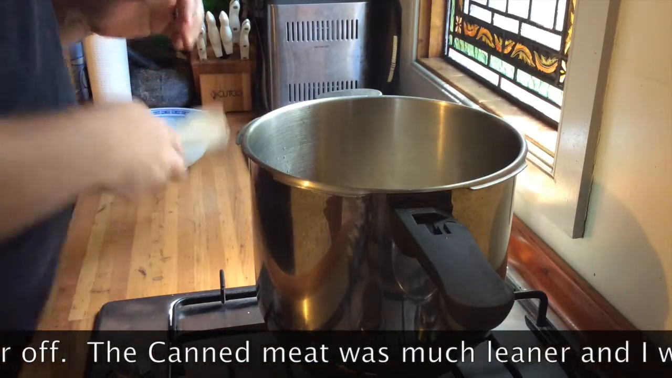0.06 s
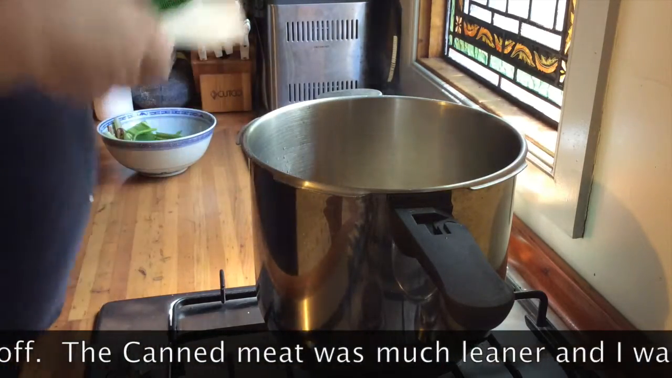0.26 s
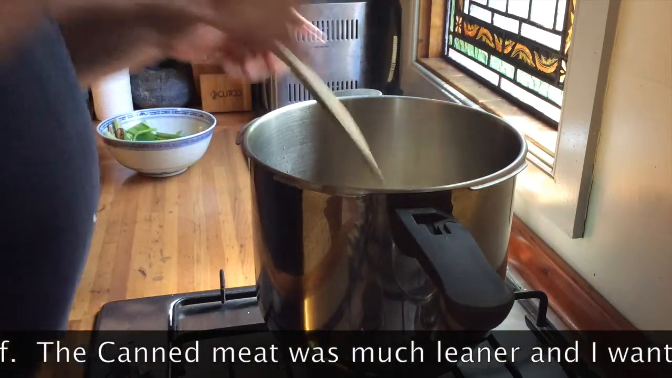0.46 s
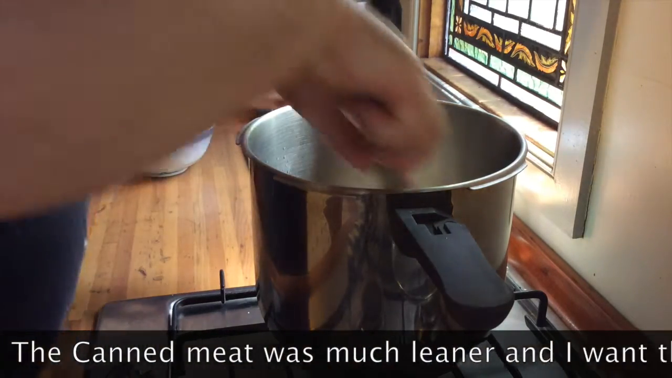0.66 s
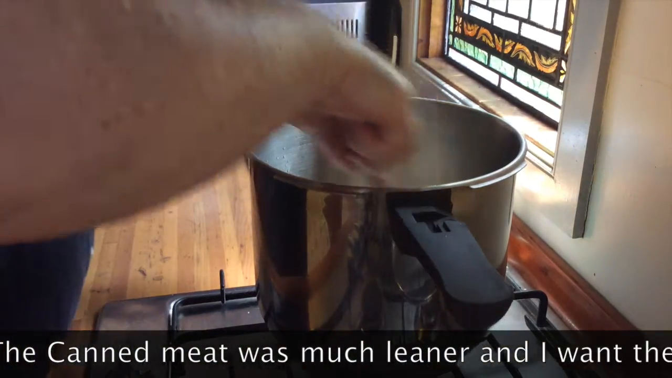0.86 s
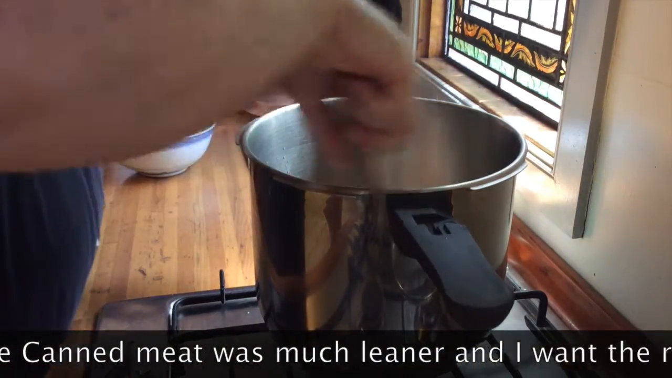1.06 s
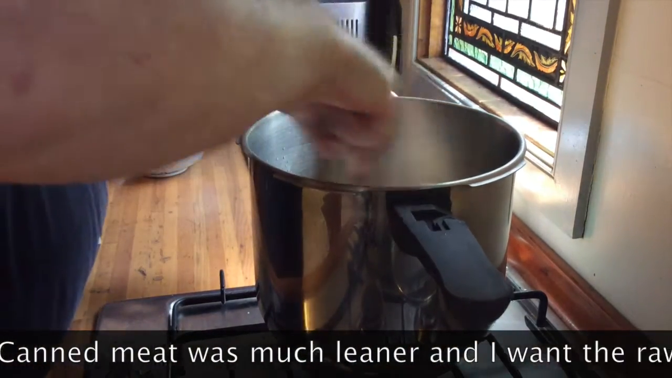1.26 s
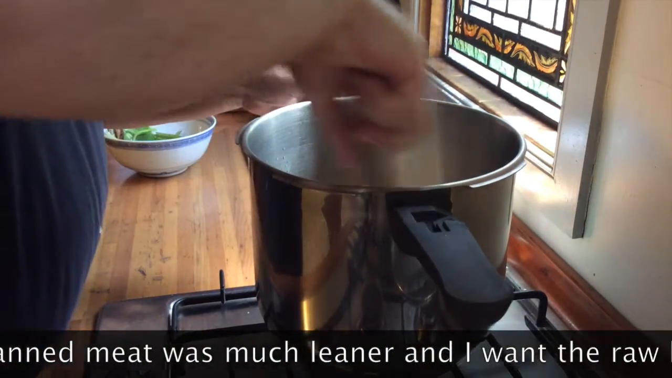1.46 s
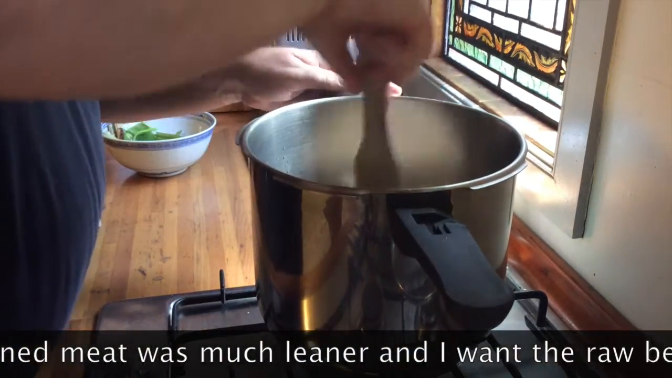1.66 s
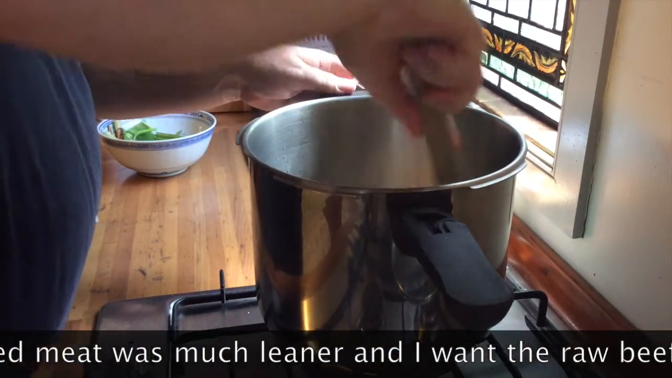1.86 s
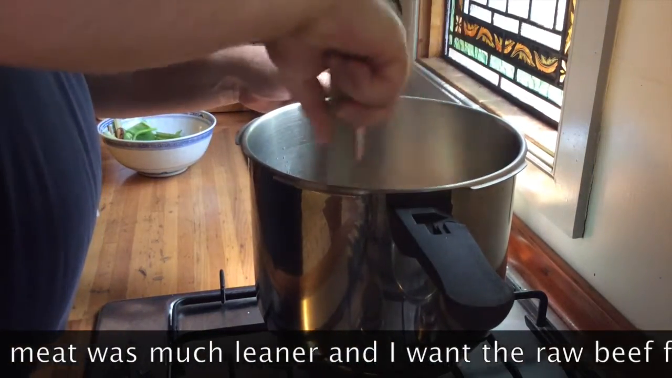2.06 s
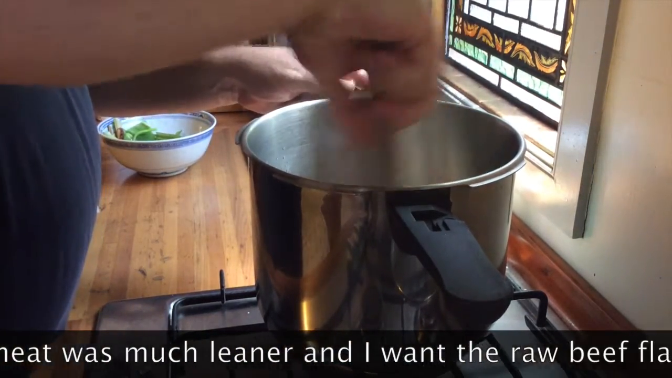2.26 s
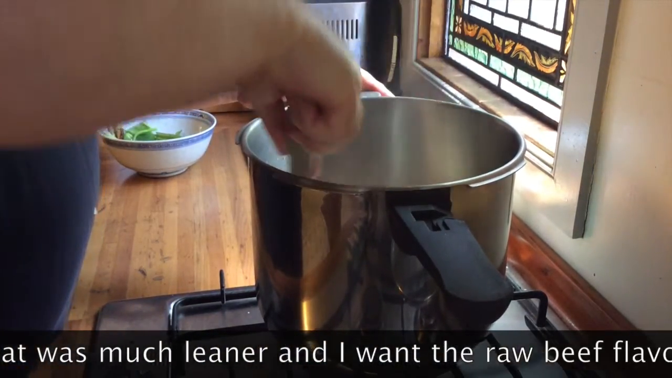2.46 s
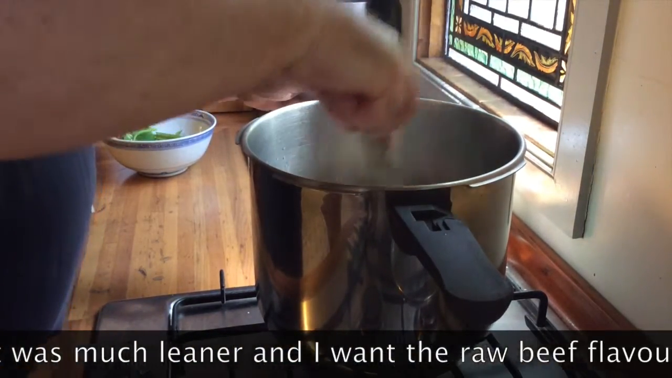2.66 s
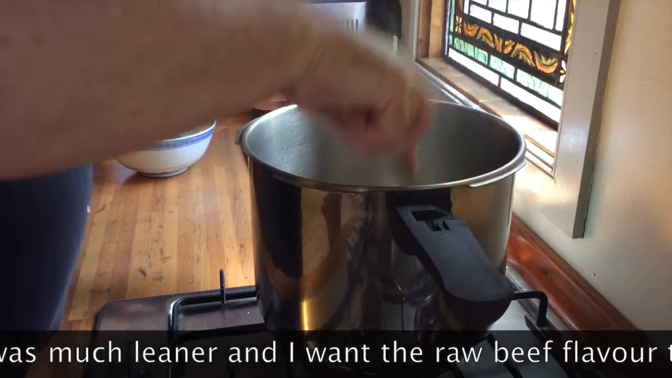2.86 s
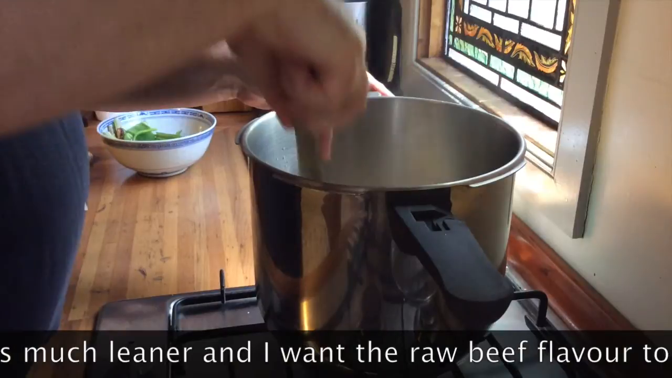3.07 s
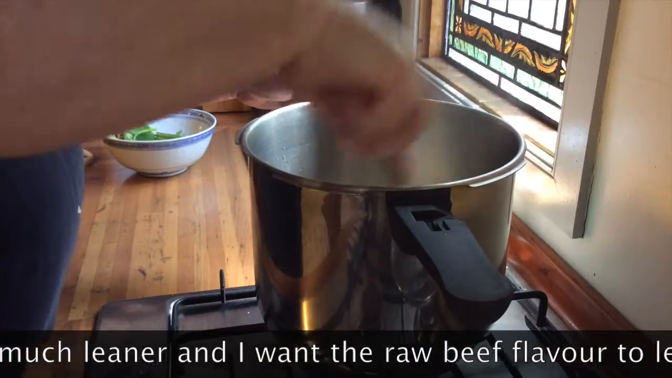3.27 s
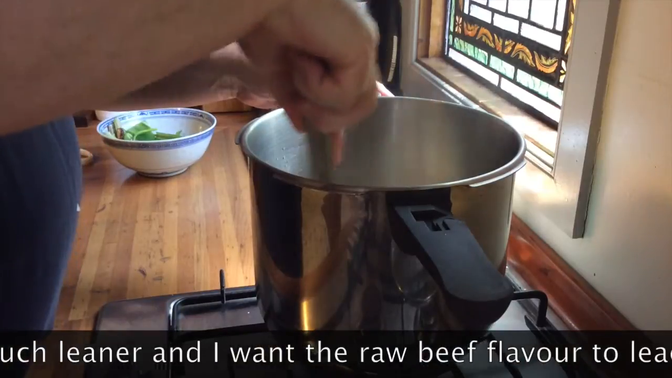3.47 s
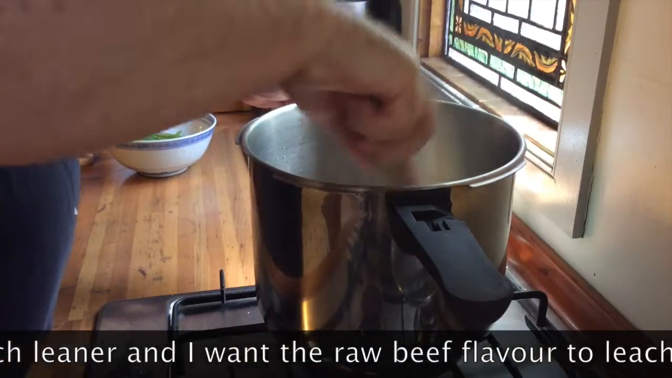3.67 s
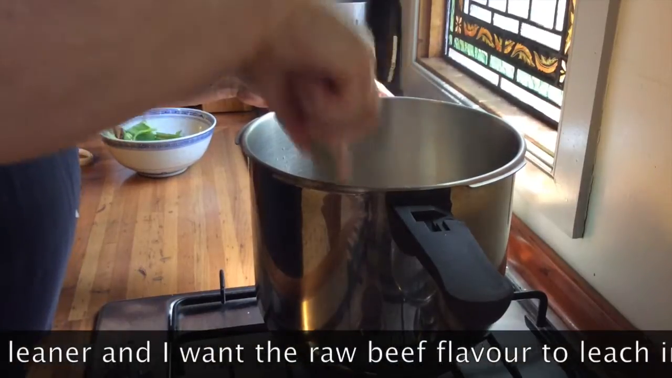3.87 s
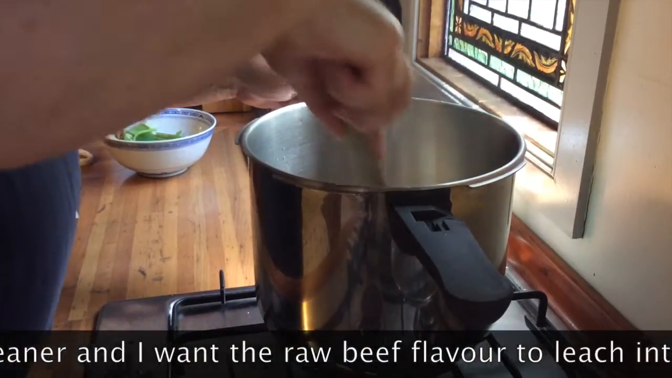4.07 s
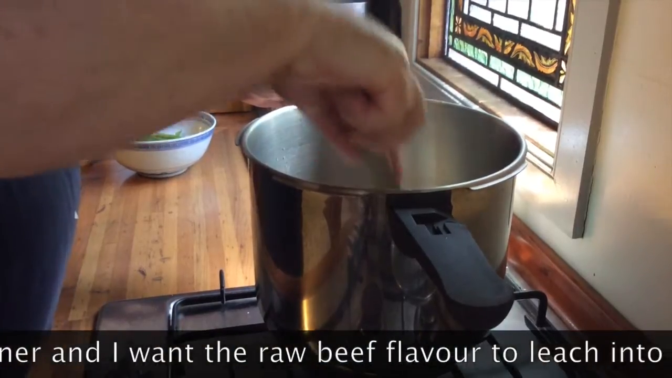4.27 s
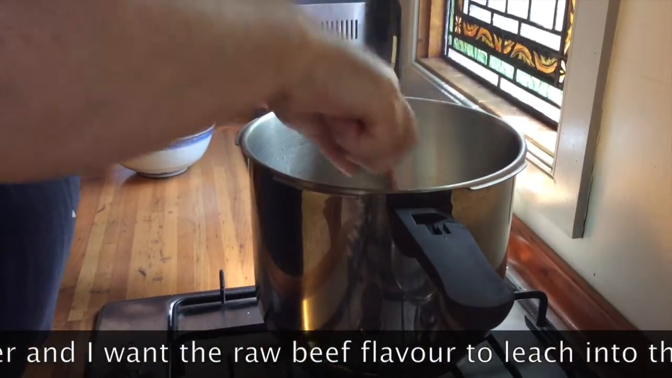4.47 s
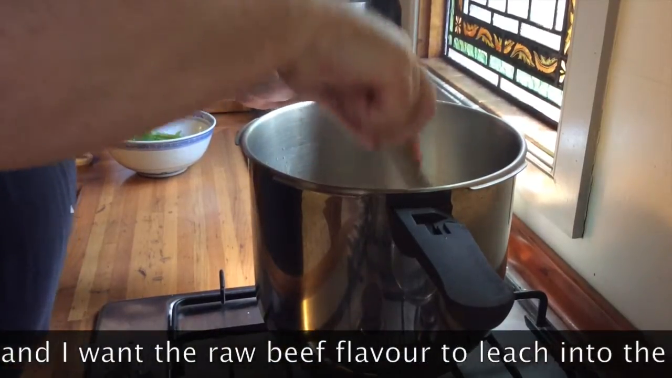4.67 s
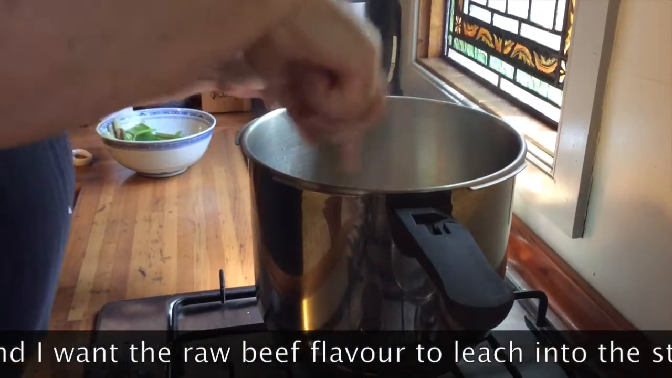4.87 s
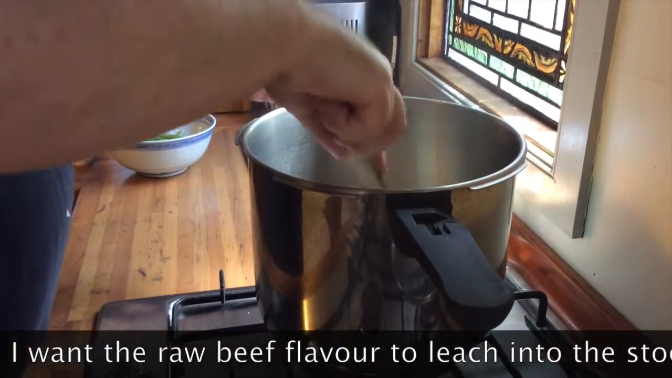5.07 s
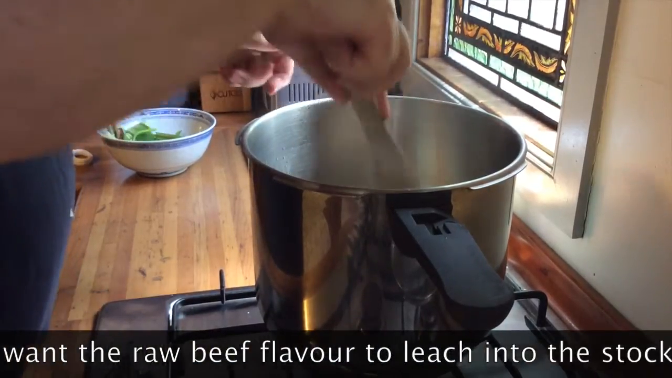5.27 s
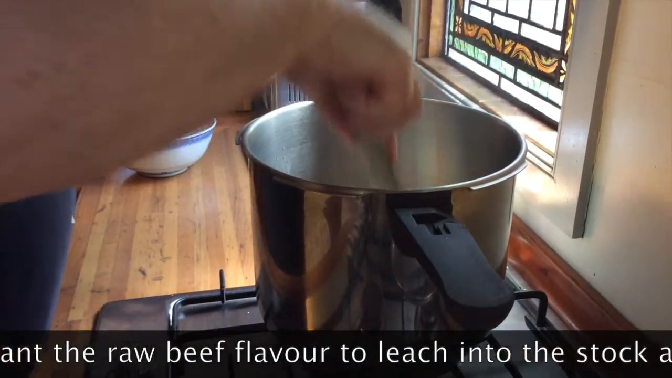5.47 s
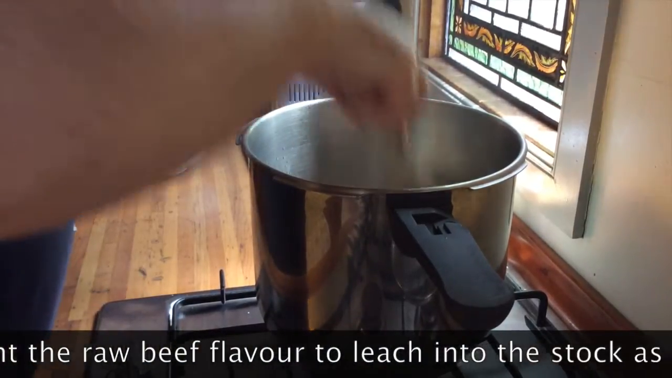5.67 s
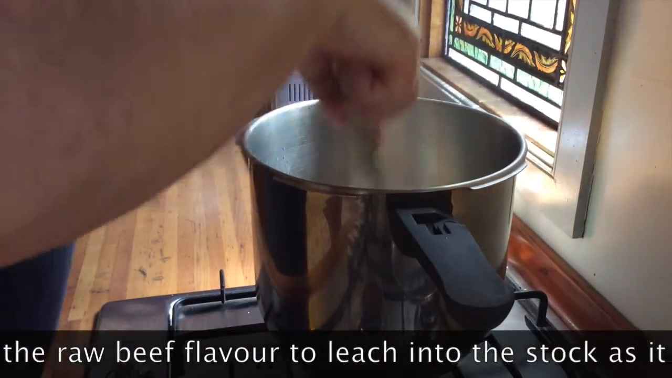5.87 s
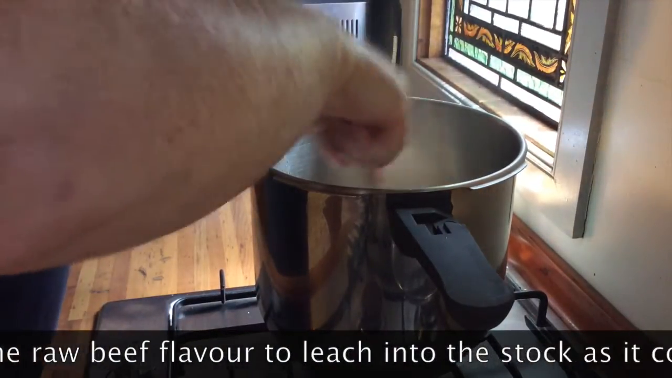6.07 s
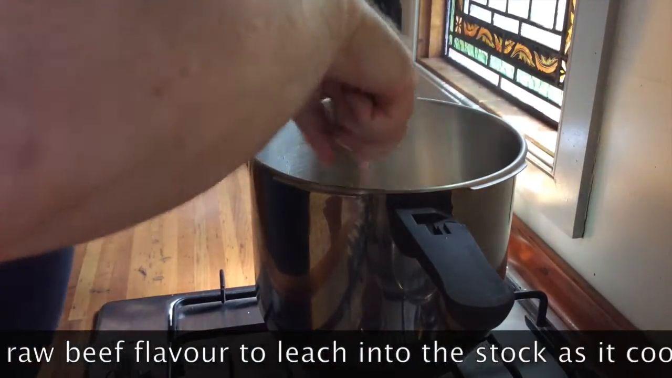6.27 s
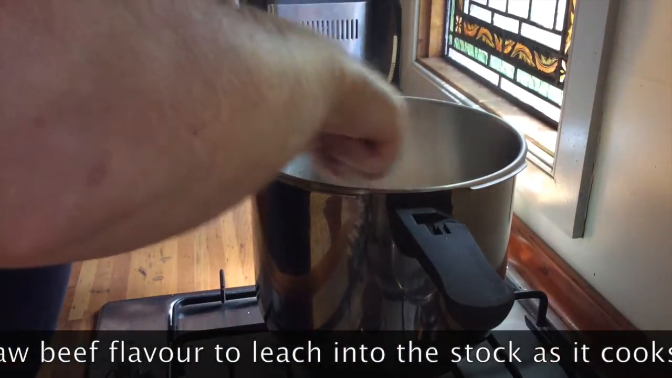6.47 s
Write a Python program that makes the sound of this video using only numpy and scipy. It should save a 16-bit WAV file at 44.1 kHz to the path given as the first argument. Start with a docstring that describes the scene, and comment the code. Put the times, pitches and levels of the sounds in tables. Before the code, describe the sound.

Food sizzles and spits in a deep steel pot, bubbles popping brightly, while a stirring spoon scrapes the bottom and knocks softly on metal.

```python
"""Kitchen, one microphone on a deep steel pot: chopped vegetables and meat fry in oil while a spoon stirs.
From the start steam bubbles burst by the thousand (clicks and hiss through the pot's resonances), the pot
booms, the spoon drags (filtered clicks), and a low sine hums over rumble. At once drops spit (noise bursts)
and soon big bubbles sing (decaying sines); from 0.7 s the spoon knocks on the steel (ringing pot modes).
Wet food flares up throughout. Close echoes ripple the treble; the top is cut steeply."""
import sys
import numpy as np
from scipy import signal
from scipy.fft import rfft, irfft
from scipy.io import wavfile

SR = 44100
rng = np.random.default_rng(int(sys.argv[2]) if len(sys.argv) > 2 else 0)


def digitize_waveform(pressure):
    """Quantize a signal to 16-bit integers and store it at the path in sys.argv[1].

    Rows of a 2-D input are taken as channels; values are limited to [-1, 1].
    """
    field = np.atleast_2d(pressure).T
    bounded = np.clip(field, -1, 1)
    quanta = np.round(bounded * 32767).astype(np.int16)
    wavfile.write(sys.argv[1], SR, quanta)


N = 288104


def from_db(db):
    return 10 ** (np.asarray(db) / 20)


def rms_one(x):
    return x / np.sqrt(np.mean(x ** 2) + 1e-20)


def band_pass(x, order, edges_hz):
    return signal.sosfilt(signal.butter(order, edges_hz, "band", fs=SR, output="sos"), x)


def high_pass(x, order, edge_hz):
    return signal.sosfilt(signal.butter(order, edge_hz, "high", fs=SR, output="sos"), x)


def over_time(table):
    """Draw each column of a table as a line over the scene, from its first column of times."""
    s, *columns = np.transpose(table)
    return [np.interp(np.arange(N) / SR, s, column) for column in columns]


def drift(rate_hz):
    """Slow chance: noise through a double one-pole low-pass at rate_hz, run in; spread 1."""
    step = 20     # samples between slow values
    r = np.exp(-2 * np.pi * rate_hz * step / SR)
    noise = rng.standard_normal(N // step + 3002)
    slow = signal.lfilter([1], [1, -2 * r, r * r], noise)[3000:]
    return np.interp(np.arange(N) / step, np.arange(len(slow)), rms_one(slow - slow.mean()))


RISE_SHARE = 0.33   # a flare or stroke rises in this share of the time it takes to fall


def swell(peak_s, length_s):
    """A rounded rise to 1 and a slower fall."""
    late = (np.arange(N) / SR - peak_s) / max(length_s, .01)
    return np.exp(-np.where(late < 0, late / RISE_SHARE, late) ** 2)


# standing resonances of the pot: (frequency [Hz], width [Hz], lift [dB])
HOLLOW = [(136, 16, -5), (165, 43, 2.5), (311, 48, 8), (422.5, 84, 10), (716, 32, 13), (802, 12.4, 14),
          (882, 52, 3.5), (973.5, 24.4, 9), (1147, 43, 3), (1384, 59, 7), (1530, 67, 10.5), (1971, 10, 6.5),
          (1996, 24, 7), (2400, 310, 3.5), (2855, 210, 2.5), (3350, 69, 2.5)]


def through_pot(x, spectrum, size=8192):
    """Causal filter whose gain is the spectrum plus the lift of each pot resonance; rms 1."""
    hz = np.maximum(np.arange(size // 2 + 1) * SR / size, 1)
    corner_hz, corner_db = np.transpose(spectrum)
    gain_db = np.interp(np.log(hz), np.log(corner_hz), corner_db)
    for centre_hz, width_hz, lift_db in HOLLOW:
        gain_db += lift_db / (1 + (2 * (hz - centre_hz) / width_hz) ** 2)
    cepstrum = irfft(np.log(from_db(gain_db)))
    cepstrum[1:size // 2] *= 2          # folding gives the minimum-phase response
    cepstrum[size // 2 + 1:] = 0
    response = irfft(np.exp(rfft(cepstrum)))
    return rms_one(signal.fftconvolve(x, response)[:N])


HISS_SHARE = 0.44   # share of the power that is smooth hiss


def bursts(per_s, spread_db, clump_db):
    """Random clicks of uneven size that come in clumps, blended with smooth steam hiss."""
    sizes = from_db(spread_db * np.minimum(rng.exponential(1, N), 5)) * rng.choice([-1, 1], N)
    born = rng.random(N) < per_s / SR
    clicks = np.sqrt(1 - HISS_SHARE) * rms_one(sizes * born)
    hiss = np.sqrt(HISS_SHARE) * rng.standard_normal(N)
    return (clicks + hiss) * from_db(clump_db)


def ring(clicks, hz, t60):
    """A unit click sets a sine of about height 1 ringing, down 60 dB after t60 seconds."""
    r, w = from_db(-60 / (t60 * SR)), 2 * np.pi * hz / SR
    return signal.lfilter([0, np.sin(w)], [1, -2 * r * np.cos(w), r * r], clicks + 1e-18)


def small_songs(per_s=400):
    """Many smaller bubbles, each at one of 40 pitches and down 60 dB after 130 cycles; rms 1."""
    sizes = from_db(3.9 * np.minimum(rng.exponential(1, N), 4))
    clicks = sizes * (rng.random(N) < per_s / SR)
    pitches_hz, dealt = np.geomspace(1900, 9000, 40), rng.integers(0, 40, N)
    return rms_one(sum(ring(clicks * (dealt == k), hz, 130.0 / hz) for k, hz in enumerate(pitches_hz)))


# colour of the bursting bubbles: (frequency [Hz], relative level [dB per Hz])
SIZZLE = [(1120, -41), (1900, -12), (2000, -8.5), (3070, -5), (3620, -5.5), (5710, 0), (7750, -2),
          (8380, 1.5), (9890, 1), (13700, 3), (15300, 1)]
# against the coarse bubbles [dB]: small bubbles, finest spray, small songs
SMALL_DB, SPRAY_DB, SONGS_DB = 0, 1, -8.5
SMALL_FOLLOWS = 0.62   # share of the treble lift


def sizzle(treble_db, surge_db):
    """Bursting bubbles in three size ranges, each flickering on its own, and small singing ones."""
    small_db, spray_db = SMALL_DB + SMALL_FOLLOWS * treble_db, SPRAY_DB + treble_db
    # (level [dB], low edge [Hz], high edge [Hz], bursts per second)
    sizes = [(0.0, 1102, 4200, 3012), (small_db, 4300, 8500, 7000), (spray_db, 8500, 18000, 4500)]
    hiss = from_db(SONGS_DB) * small_songs()
    for level_db, low_hz, high_hz, per_s in sizes:
        pops = through_pot(bursts(per_s, 2, surge_db + 0.61 * drift(7.4)), SIZZLE)
        hiss += from_db(level_db) * rms_one(band_pass(pops, 4, [low_hz, high_hz]))
    return hiss


# colour of the pot's boom: (frequency [Hz], relative level [dB per Hz])
BOOM = [(500, -28), (660, -25), (800, -21), (1000, -6), (1300, -11.5), (1600, -8.5), (1800, -11.5),
        (2000, -16.5), (2300, -24), (3000, -52)]


def boom(surge_db):
    """Bursts heard through the hollow of the pot; rms 1."""
    return through_pot(bursts(3000, 3.5, 0.78 * surge_db + 0.89 * drift(10)), BOOM)


# colour of the spoon on the bottom: (frequency [Hz], relative level [dB per Hz])
DRAG = [(50, -32), (80, -32.5), (130, -7), (200, -13), (260, -10), (360, -12.5), (450, -10.5), (540, -13.5),
        (650, -22), (800, -52.5)]
# the spoon pushes through the food along the bottom: (peak time [s], lift [dB], length [s])
STROKES = [(0.694, 5.5, 0.083), (.8, 6, 0.045), (1.12, 8.5, 0.11), (1.33, 5.5, 0.12), (1.595, 4.5, 0.16),
           (1.837, 1, 0.11), (2.108, 4, 0.4), (2.45, -1, .1), (2.71, 4, 0.049), (3.17, 1.5, 0.16),
           (3.58, 3.5, 0.072), (3.777, 3, 0.11), (4.22, 2.5, 0.21), (4.746, 1, 0.081), (5.047, 0, 0.085),
           (5.31, 0.5, .1), (5.57, -1, .08), (5.77, -1, 0.058), (5.945, 3, 0.034), (6.205, 1, 0.32),
           (6.464, 3.5, 0.13)]
DRAG_DB, DRAG_FOLLOWS = -15, .8   # at rest against the mean heat [dB]; share of the heat's changes


def spoon_drag(heat_db, surge_db):
    """Fine scrapes as random clicks through the pot, lifted by each stroke."""
    scrapes = through_pot(bursts(600, 2.56, 0.59 * surge_db + 0.12 * drift(23.0)), DRAG)
    stroke_db = sum(db * swell(peak_s, length_s) for peak_s, db, length_s in STROKES)
    mean_db = heat_db.mean()
    return from_db(DRAG_DB + mean_db + DRAG_FOLLOWS * (heat_db - mean_db) + stroke_db) * scrapes


# wet food turned onto the hot steel flares up:
# (peak time [s], lift [dB], length [s], extra lift of the treble [dB])
FLARES = [(0.012, 4.5, 0.03, -1.5), (0.088, 1, 0.017, -3), (1.143, 2, .04, -1.5), (1.23, 2, 0.042, 0),
          (1.318, 4, 0.027, -0.5), (1.38, 4, 0.083, 3.5), (1.576, 1, 0.083, 1), (1.77, 1.5, 0.14, -0.5),
          (2.18, 3.5, .1, 0), (2.27, 0.5, .08, -1.5), (2.57, 4, 0.16, -1), (2.655, 0.5, .1, -1),
          (2.903, 0, .08, 1), (3.154, 1.5, 0.077, 3.5), (3.515, 1, 0.11, 2.5), (4.085, 0.5, 0.044, 2),
          (4.25, 1, 0.077, 1.5), (5.75, 3, 0.021, -4), (5.926, 1, .08, -1.5), (6.22, -1, 0.14, 4.5),
          (6.503, 2, .08, 2)]


def flares():
    """Each flare swells and falls; returns the lift of the frying and the extra lift of its treble, in dB."""
    flare_db, extra_treble_db = np.zeros(N), np.zeros(N)
    for peak_s, lift_db, length_s, treble_lift_db in FLARES:
        shape = swell(peak_s, length_s)
        flare_db += lift_db * shape
        extra_treble_db += treble_lift_db * shape
    return flare_db, extra_treble_db


# how hard the oil fries between the flares: (time [s], sizzle level [dB], treble above it [dB])
HEAT = [(0, -42, 2.5), (.52, -42, 3), (.65, -43, 1), (.7, -39, 2), (.9, -39.5, 4), (1.05, -33.5, 2),
        (1.9, -33.5, 3), (1.97, -34, 2.5), (2.3, -31.5, 2), (2.42, -33, 1), (2.7, -33, 2), (3.05, -33.5, 2),
        (3.75, -33, 2), (3.88, -34, 1), (4.6, -34.5, 3.5), (5.2, -35.5, 2), (6.08, -36, 3),
        (6.16, -30.5, 0.5), (6.53, -34, 4)]
BOOM_DB, BOOM_FOLLOWS = -7.5, 1   # against the heat level [dB]; share of the flares


def frying():
    """Sizzle, boom and drag share one surge and the heat; the flares lift sizzle and boom."""
    heat_db, treble_db = over_time(HEAT)
    flare_db, extra_treble_db = flares()
    surge_db = 0.11 * drift(32) + 0.49 * drift(41)
    hiss = from_db(heat_db + flare_db) * sizzle(treble_db + extra_treble_db, surge_db)
    hollow = from_db(heat_db + BOOM_DB + BOOM_FOLLOWS * flare_db) * boom(surge_db)
    return hiss + hollow + spoon_drag(heat_db, surge_db)


# level of the hum before its wavering: (time [s], rms level [dB])
HUM = [(0, -67), (.7, -62), (.98, -56), (1.1, -58), (1.38, -59), (1.6, -65), (1.95, -57), (2.04, -68),
       (2.15, -56), (2.3, -64), (3.6, -66), (3.73, -60), (3.84, -67), (4.5, -59.5), (6.2, -62), (6.33, -67),
       (6.53, -64)]
HUM_HZ, HUM_RUMBLE_DB = 48.6, -71


def hum():
    """A low sine of wavering pitch and level over faint rumble."""
    phase = 2 * np.pi * np.cumsum(HUM_HZ + 1.24 * drift(3)) / SR
    rumble = rms_one(band_pass(rng.standard_normal(N), 2, [40, 100]))
    level_db = over_time(HUM)[0] + 0.73 * drift(4)
    tone = np.sqrt(2) * np.sin(phase)
    return from_db(level_db) * tone + from_db(HUM_RUMBLE_DB) * rumble


# larger drops spitting, before echoes:
# (time [s], peak level [dB], centre [Hz], reach to each side [octaves])
SPITS = [(0.0172, -19, 4000, 1.3), (.03, -22, 6580, 0.62), (0.086, -20, 3500, 1.2), (0.091, -23, 4000, .7),
         (.1501, -21, 7000, 0.56), (0.223, -16.5, 11500, 1.1), (.3381, -25, 8500, .5),
         (0.443, -15, 6000, 2.5), (.4676, -24, 9000, .8), (.533, -23, 6550, 1.1), (.6868, -22, 4940, 0.99),
         (1.045, -14, 3380, 1.7), (1.14, -14, 2430, 0.82), (1.2194, -11, 5750, 1.1),
         (1.2417, -11, 3350, 0.56), (1.3827, -19, 2110, .8), (1.407, -13, 7500, 0.56),
         (1.5984, -7, 5960, 1.5), (1.647, -17, 5000, 1.4), (1.716, -12, 4620, 1.3), (1.7842, -9, 5790, 1.1),
         (1.834, -13, 8240, 1.1), (1.922, -13, 2480, 0.96), (2.0198, -15, 11700, 0.76),
         (2.175, -13, 2490, 0.44), (2.27, -16, 2480, 0.44), (2.311, -18, 3200, 0.66),
         (2.392, -18, 3000, 0.55), (2.5473, -19, 3300, 0.87), (2.8125, -23, 1520, 0.64),
         (3.282, -20, 4340, 1.2), (4.344, -15, 14000, .8), (4.735, -17, 2320, 0.67),
         (4.8329, -11, 13200, 0.67), (5.0584, -11, 13100, 0.97), (6.0756, -21, 5400, 1.1),
         (6.236, -16, 2800, .5), (6.427, -13, 3000, 0.72), (6.481, -15.5, 2500, .7)]
CRACK_T60_S, PUFF_SHARE, PUFF_T60_S = .005, 0.25, 0.17


def spits():
    """A crack, then a puff of steam dying away, noise broad around its centre pitch."""
    out, t = np.zeros(N + SR), np.arange(SR // 4) / SR
    fade = from_db(-60 * t / CRACK_T60_S) + PUFF_SHARE * from_db(-60 * t / PUFF_T60_S)
    for s, db, hz, octaves in SPITS:
        reach = max(octaves, .3) * np.array([-1, 1])
        edges_hz = np.clip(hz * 2 ** reach, 1200, .45 * SR)
        puff = band_pass(rng.standard_normal(len(t)) * fade, 2, edges_hz)
        at = round(s * SR)
        out[at:at + len(t)] += from_db(db) * puff / np.abs(puff).max()
    return out[:N]


# big bubbles that sing a pitch as they burst:
# (time [s], pitch [Hz], level before swell and decay [dB])
SINGING = [(.086, 2842, -34), (.995, 3000, -24), (1.135, 1980, -32), (1.138, 2460, -19), (1.222, 5840, -30),
           (1.24, 3320, -14), (1.24, 3750, -28), (1.377, 6940, -17), (1.38, 2050, -12), (1.392, 2150, -17),
           (1.405, 4600, -31), (1.413, 6245, -29), (1.783, 5800, -11), (1.784, 2800, -16),
           (2.12, 2325, -14.5), (2.182, 2780, -17), (2.198, 3320, -30), (2.363, 5260, -17),
           (2.543, 4250, -32), (2.546, 2240, -32), (2.567, 3880, -20), (2.607, 4740, -30),
           (2.735, 2920, -21), (3.162, 4830, -30), (3.542, 6000, -21), (6.137, 2720, -20),
           (6.154, 4030, -23), (6.426, 2120, -20.5)]
SING_T60_S = 0.024


def singing():
    """A big bubble swells for a few ms and rings down at its own pitch."""
    out, t = np.zeros(N + SR), np.arange(SR // 8) / SR
    for s, hz, db in SINGING:
        at = round(s * SR)
        envelope = from_db(db - 60 * t / SING_T60_S) * (1 - np.exp(-t / 0.0013))
        out[at:at + len(t)] += envelope * np.sin(2 * np.pi * hz * t)
    return out[:N]


# spoon against steel, before the low cut:
# (time [s], peak level [dB], pitch the struck spot favours [Hz], spread [octaves], contact [s])
KNOCKS = [(0.678, -32, 230, 1.4, 0.06), (.764, -33, 1450, .05, 0.034), (.791, -29.5, 430, 0.79, 0.019),
          (.95, -33, 200, 1.1, 0.029), (1.041, -30.5, 500, 0.94, 0.021), (1.113, -25, 230, 1.6, 0.054),
          (1.161, -28.5, 320, 0.79, .03), (1.215, -32, 200, 0.57, 0.036), (1.312, -27, 1030, 0.27, 0.024),
          (1.329, -27, 1440, .15, 0.018), (1.571, -28.5, 400, 0.28, 0.049), (1.813, -27, 467, 0.31, 0.037),
          (1.826, -30, 905, 0.086, .045), (2.065, -25, 900, 1.6, 0.01), (2.193, -23.5, 1510, .15, 0.017),
          (2.43, -25, 600, 0.94, 0.048), (2.436, -37.5, 150, .4, 0.065), (3.161, -42, 170, 0.35, .03),
          (4.228, -37, 300, 1.5, .02), (4.735, -31.5, 1500, 0.84, .006), (5.754, -35.5, 150, 0.42, 0.12),
          (6.113, -35, 780, .1, 0.024), (6.2, -36.5, 150, 0.5, .09), (6.226, -28, 1510, .12, 0.026),
          (6.285, -38, 150, .5, .03), (6.286, -28, 1120, .15, 0.017), (6.475, -34, 1530, 0.11, .03)]
# ringing modes of the pot: (frequency [Hz], relative level [dB], time to fall 60 dB [s])
POT_MODES = [(137.3, -1.5, 0.24), (182.6, -1.5, 0.15), (241, -9, 0.065), (318, -13, .09), (383, 0, 0.043),
             (430, -2.5, 0.094), (530, -3.5, 0.037), (600, -1.5, 0.043), (690, -8, .05), (780, 2.5, 0.1),
             (905, -4, 0.13), (1030, 10, 0.075), (1128, 9, 0.047), (1450, 5, 0.11), (1534, -6, 0.062),
             (1990, -14, .04), (2340, 2, .04)]


def knocks():
    """Each knock is a short scuffing contact that rings the pot modes near the pitch its spot favours."""
    out, t = np.zeros(N + SR), np.arange(SR // 2) / SR
    for s, db, spot_hz, octaves, contact_s in KNOCKS:
        rings = np.zeros(len(t))
        for hz, mode_db, t60 in POT_MODES:
            luck_db = 1.5 * rng.standard_normal()
            off_spot_db = -6.9 * (np.log2(hz / spot_hz) / octaves) ** 2
            rings += from_db(mode_db + luck_db + off_spot_db - 60 * t / t60) * np.sin(2 * np.pi * hz * t)
        scuff = rng.standard_normal(SR // 10)
        push = (3.0 + scuff) * from_db(-14 * t[:len(scuff)] / max(contact_s, .002))
        push = np.diff(push, prepend=0) + 0.81 * scuff * push      # sharp first touch, then friction
        blow = signal.fftconvolve(rings, push)[:len(t)]
        at = round(s * SR)
        out[at:at + len(t)] += from_db(db) * blow / np.abs(blow).max()
    return high_pass(out[:N], 4, 115)


ECHO_DB, ECHO_T60_S = -14, 0.18   # steel walls and tiles, against the direct sound


def echoes(x, edge_hz=1900):
    """Dense early echoes ripple the treble and trail each crack; direct treble gives way to keep the power."""
    t = np.arange(SR // 6) / SR
    tail = rng.standard_normal(len(t)) * from_db(-60 * t / ECHO_T60_S) * (t > .0015)
    tail = high_pass(tail, 2, edge_hz)
    tail *= from_db(ECHO_DB) / np.sqrt(np.sum(tail ** 2))
    keep = 1 / np.sqrt(1 + from_db(2 * ECHO_DB))
    direct = x + (keep - 1) * high_pass(x, 2, edge_hz)
    return direct + keep * signal.fftconvolve(x, tail)[:N]


def scene():
    """One microphone feeds both channels; knocks and hum reach it without the echoes."""
    echoing = echoes(frying() + spits() + singing())
    return np.tile(echoing + hum() + knocks(), (2, 1))


def record(dry):
    """The top is cut steeply above 15340 Hz."""
    return signal.sosfilt(signal.ellip(14, .3, 80, 15340, fs=SR, output="sos"), dry)


dry = scene()
out = record(dry)
digitize_waveform(out)
```